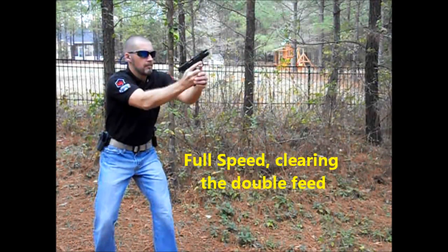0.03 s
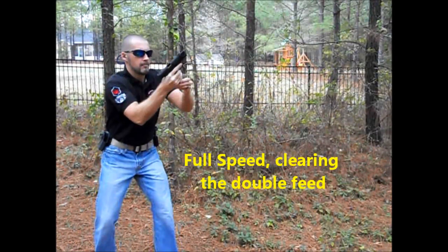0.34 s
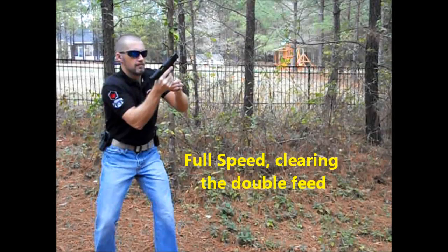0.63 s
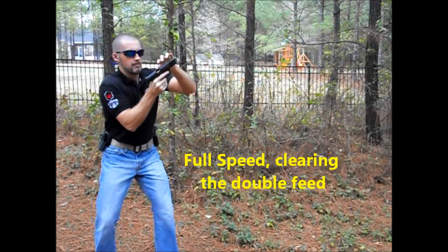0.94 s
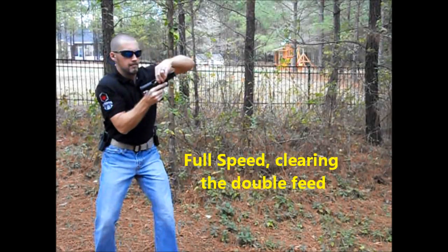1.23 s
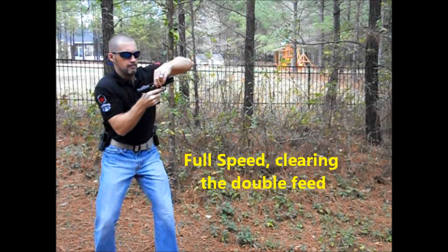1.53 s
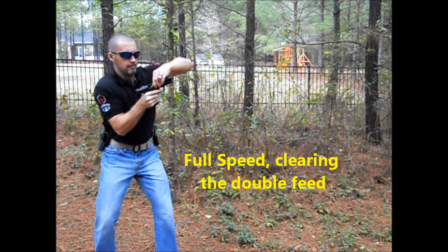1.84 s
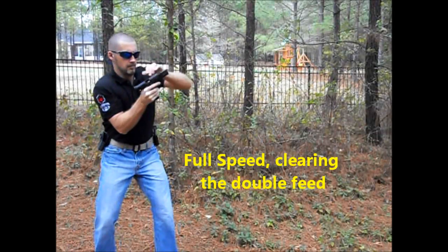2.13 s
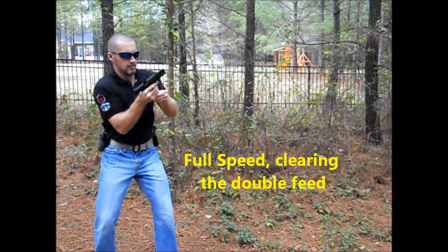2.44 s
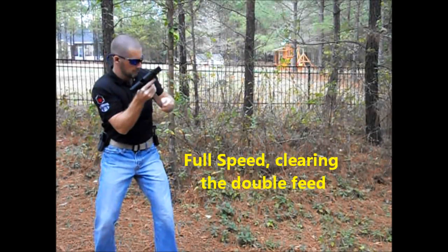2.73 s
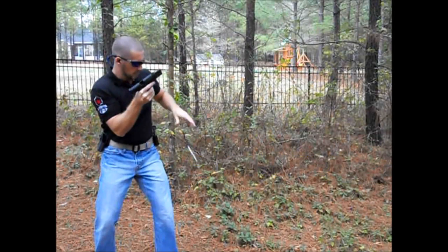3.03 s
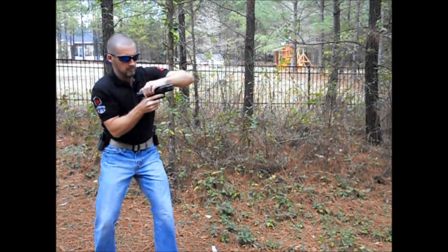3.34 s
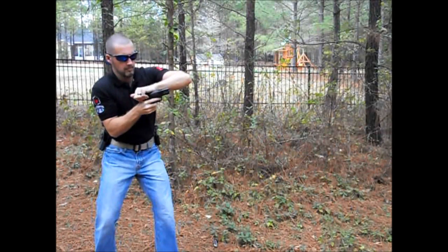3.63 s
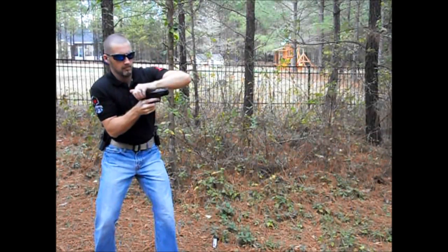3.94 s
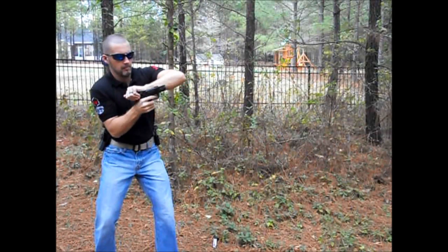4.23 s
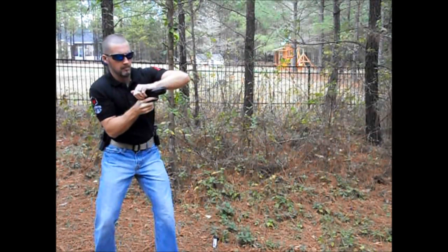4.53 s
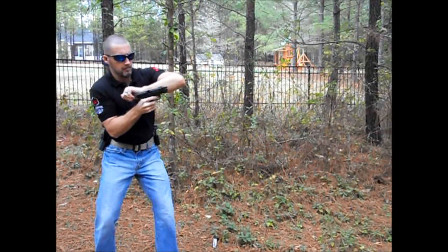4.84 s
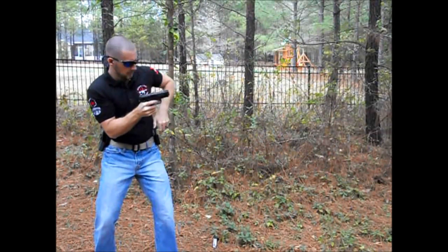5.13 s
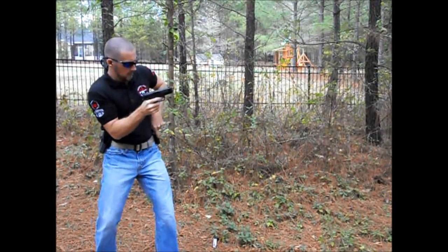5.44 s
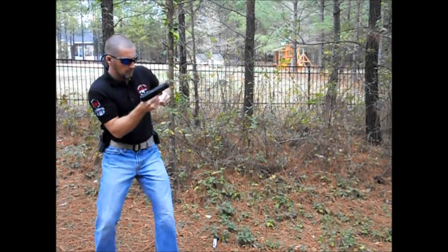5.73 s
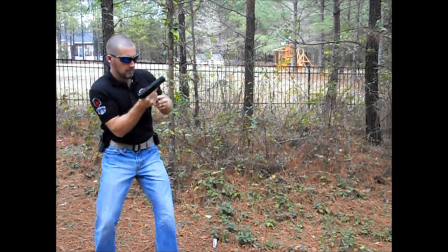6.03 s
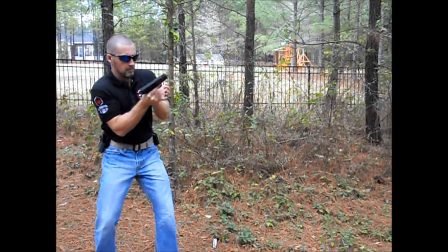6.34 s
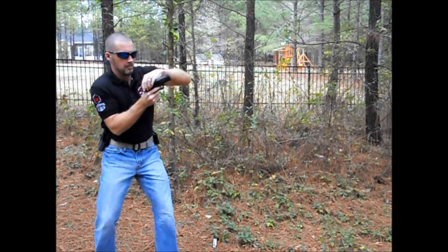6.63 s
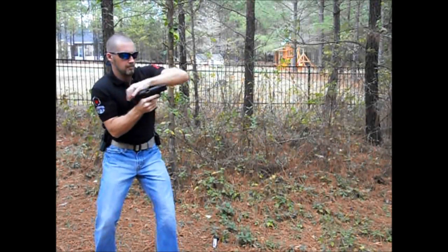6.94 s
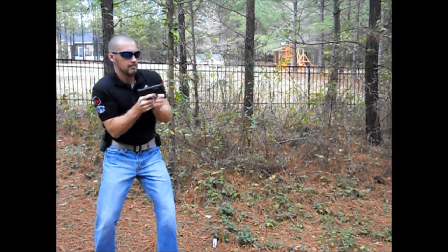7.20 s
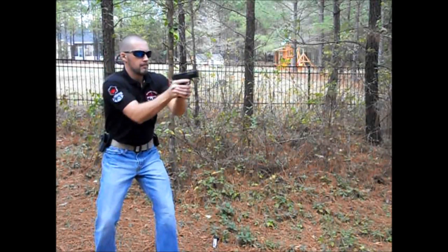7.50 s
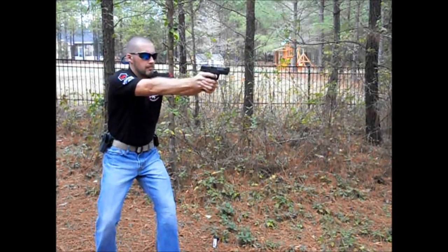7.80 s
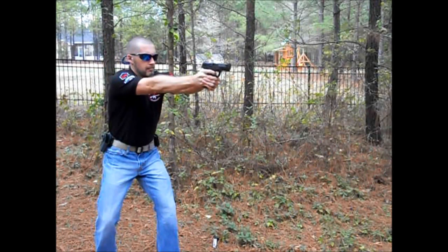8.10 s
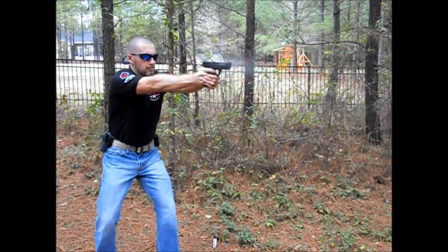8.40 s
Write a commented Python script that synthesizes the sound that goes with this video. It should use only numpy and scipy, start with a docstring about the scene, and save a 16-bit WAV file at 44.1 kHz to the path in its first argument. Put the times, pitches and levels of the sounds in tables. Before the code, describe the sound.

Faint traffic hums outdoors as a handgun is racked repeatedly, reloaded with metallic clacks, and fired once.

```python
"""Far traffic hums behind the trees of a wood. Then a pistol clacks, steel striking steel: its slide
(the moving top) is locked back, the magazine pulled out, the slide worked three times, a fresh magazine
pushed in and the slide worked again. Each time the slide slams shut, its spring buzzes and rings.
One shot is fired, and ground and trunks throw the blast back. An automatic volume control ducks
at every loud bang, holds, then lets the background swell back."""
import sys
import numpy as np
from scipy import signal
from scipy.fft import rfft, irfft, next_fast_len
from scipy.io import wavfile
from scipy.ndimage import minimum_filter1d, map_coordinates

SR = 44100
rng = np.random.default_rng(int(sys.argv[2]) if len(sys.argv) > 2 else 0)


def store_pcm(level_fs):
    """Save levels as 16-bit WAV."""
    pcm = np.round(np.clip(level_fs, -1, 1) * 32767).astype(np.int16)
    wavfile.write(sys.argv[1], SR, np.atleast_2d(pcm).T)


N = 381940
TIME = np.arange(N) / SR

# tone colour of far traffic and hiss: (frequency [Hz], level [dB])
AIR_COLOUR = [(12, -33.5), (20, 1), (114, -2), (152, -8.5), (230, -8.5), (332, -8), (430, -9.5),
              (503, -5.5), (687, -8.5), (762, -7.5), (1220, -10), (1350, -12.5), (2100, -17), (7710, -22.5),
              (10000, -24.5), (13000, -53), (22000, -120)]
# loudness of two far engines: (time [s], level [dB])
LOW_ENGINE = [(0, -73), (.65, -58.5), (2.05, -62), (2.601, -52.5), (3.701, -57), (4.3, -64.5), (6.4, -66.5),
              (7.699, -54.5)]
HIGH_ENGINE = [(0, -79), (5.2, -71.5), (5.8, -61.5), (8.299, -58.5)]
# loudness of far tyres going by: (time [s], level [dB])
TYRE_LEVELS = [(0, -60), (1.3, -56), (2.1, -52.5), (3.1, -53.5), (4.4, -52.5), (5.4, -57.5), (8.3, -58.5)]
# tone colour of the tyres: (frequency [Hz], level [dB])
TYRE_COLOUR = [(200, -22), (340, -2.5), (430, -7.5), (530, -1), (700, 0), (950, -8.5), (1600, -25)]
# scatter from near trunks; a fade time (t60) is the time to drop 60 dB: (frequency [Hz], fade time [s])
TREE_FADES = [(200, .2), (1000, 0.36), (2500, 0.18), (6000, 0.25), (10000, .24)]
# tone colour of the pistol: (frequency [Hz], level [dB])
PISTOL_COLOUR = [(60, -29), (300, -17), (700, -10.5), (1100, -9.5), (1600, -4), (2400, 0.5), (3200, 2.5),
                 (5500, -2.5), (8000, -4), (10300, -7), (12000, -24.5)]
# resonances, the pitches that slide and frame favour: (frequency [Hz], width [Hz], boost [dB])
RESONANCES = [(1610, 180, 3.5), (2150, 220, 4), (2520, 200, 1.5), (3700, 300, -1.5), (5210, 520, 5),
              (6050, 400, 5.5), (6950, 420, 3), (9400, 400, 1.5)]
# light ticks and knocks as pistol and magazines are handled: (time [s], level [dB], pitch [Hz])
TICKS = [(1.678, -32.5, 7150), (1.9825, -36, 4200), (2.2304, -44, 2000), (2.618, -36, 3540),
         (2.851, -32.5, 9950), (2.861, -36, 3140), (3.5546, -32, 5700), (3.56, -33.5, 2820),
         (3.6323, -32, 5640), (3.9278, -33, 2090), (4.079, -33, 5060), (4.109, -28.5, 4200),
         (4.6303, -27.5, 6180), (5.1503, -41.5, 1435), (5.4394, -31.5, 1160), (5.4728, -28, 1170),
         (5.9247, -39.5, 6040), (6.1315, -29.5, 2970), (7.206, -36, 1900)]
# slide or magazine rubbing on its guides: (start [s], end [s], final level [dB], swell [dB])
SCRAPES = [(2.611, 2.703, -37, 3.5), (1.145, 1.154, -36, 8), (3.271, 3.276, -24, 15.5),
           (3.597, 3.62, -48.5, -3), (4.629, 4.666, -39, -2), (5.438, 5.473, -39, -4.5),
           (6.09, 6.159, -29.5, 19), (6.888, 6.921, -25.5, 7)]
# three blows each for magazine out, jammed slide let go and fresh magazine in; more tilt is brighter:
# (time [s], level [dB], fade time [s], tilt [dB/octave], resonance [Hz], boost [dB])
CLACKS = [(2.6374, -28, .014, 1, 5540, 11), (2.642, -20.5, .026, -0.5, 2725, 24),
          (2.679, -21.5, .03, -0.5, 4700, 12.5), (3.2757, -9, 0.039, 5.5, 3667, 13),
          (3.2846, -8, .03, 4, 3005, 22.5), (3.2868, -7.5, 0.017, 4, 3017, 27.5),
          (6.1549, -18, .024, 5.5, 3332, 14), (6.1665, -10, .039, 0, 2500, 7),
          (6.1791, -5.5, .038, 0, 2005, 4.5)]
# the slide hits its rear stop: (time [s], level [dB], run-up softer by [dB], fade time [s],
# tilt [dB/octave], resonance [Hz], boost [dB])
PULLS = [(1.1543, -14.5, 18.5, 0.019, -.5, 5620, 15), (4.1326, -9.5, 25, 0.027, 0, 1620, 11.5),
         (4.6655, -9, 23, 0.033, -2.5, 6300, 14.5), (6.757, -2.5, 17.5, 0.033, -0.5, 2780, 8.5)]
# the slide slams shut: (time [s], level [dB], run-up softer by [dB], run-up step [s], bounce level [dB],
# buzz level [dB], ring level [dB])
SLAMS = [(3.7459, -2.5, 16, 0.01, -28.5, -11.5, -31), (4.3065, -3.5, 16, 0.011, -10, -34.5, -25),
         (4.8186, -1.5, 18, .009, -19, -19, -28.5), (6.922, -1.5, 8, 0.0091, -20, -33, -27.5)]
# ringing of spring and barrel: (frequency [Hz], level [dB], fade time [s])
RING_TONES = [(2842, -14.5, .3), (3278, -5.5, 0.68), (5195, -14, .3), (5270, -11, 0.23), (5986, -6, .2),
              (6444, -12, 0.16), (6990, -4.5, .25), (7725, -7, .15), (8037, -8.5, .21), (8200, -8.5, .22),
              (9028, -13, .3)]
# tone colour of the buzzing coils: (frequency [Hz], level [dB])
COIL_COLOUR = [(500, -26), (2000, -1), (5000, 3.5), (8000, 3), (10500, -4)]
# tone colours of the blast and of its echo: (frequency [Hz], level [dB])
BLAST_COLOUR = [(30, -6.5), (200, -10.5), (450, -4.5), (900, -2.5), (2000, -5), (6000, -4.5),
                (10500, -17.5)]
ECHO_COLOUR = [(40, -21.5), (250, -15.5), (480, 0.5), (900, 2.5), (1300, 0.5), (2000, -6.5), (5000, -9),
               (10000, -15)]
# how long the shot lingers in the wood: (frequency [Hz], fade time [s])
FOREST_FADES = [(100, 0.54), (350, 0.53), (900, 0.95), (2000, 0.84), (5000, .6), (10000, 0.28)]
# single trunks throw the shot back: (delay [s], level [dB])
TRUNK_ECHOES = [(0.0352, -4.5), (0.0691, -10), (.086, -23)]


def amp(db):
    """Turn decibels into a multiplier."""
    return 10 ** (np.asarray(db) / 20)


def unit(x):
    """Scale x to an average power of 1."""
    return x / np.sqrt(np.mean(x ** 2) + 1e-20)


def burst(x):
    """Scale x to the energy of 5 ms at power 1."""
    return x * np.sqrt(.005 * SR / (np.sum(x ** 2) + 1e-20))


def along(points, hz):
    """Read between (frequency, value) points, spaced by octaves."""
    freqs, values = np.transpose(points)
    return np.interp(np.log(hz + 1), np.log(freqs + 1), values)


def add(track, s, x):
    """Mix x into the track from time s."""
    part = track[round(s * SR):][:len(x)]
    part += x[:len(part)]


def wobble(rate):
    """A smooth curve through `rate` random values a second."""
    return map_coordinates(rng.standard_normal(int(N * rate / SR) + 4), [TIME * rate])


def filtered(x, gain):
    """Multiply each frequency in x by gain(hz)."""
    size = next_fast_len(len(x) + 8192)
    return irfft(rfft(x, size) * gain(np.fft.rfftfreq(size, 1 / SR)), size)[:len(x)]


def coloured(x, colour, size=2048):
    """Shape x by colour(hz) in dB, so that ringing only comes after a hit."""
    cepstrum = irfft(np.log(amp(colour(np.fft.rfftfreq(size, 1 / SR)))))
    cepstrum[1:size // 2] *= 2
    cepstrum[size // 2 + 1:] = 0
    return signal.fftconvolve(x, irfft(np.exp(rfft(cepstrum))))


def smoothed(x, lag_s):
    """Follow x slowly, evening out quick changes."""
    keep = np.exp(-1 / (SR * lag_s))
    return signal.lfilter([1 - keep], [1, -keep], x)


def chatter(t60):
    """Noise that starts at once and dies away."""
    t = TIME[:SR // 3]
    return rng.standard_normal(len(t)) * np.exp(-np.log(1000) * t / t60)


def tail(fades):
    """A wash of echoes, each frequency dying at its own speed."""
    hz, t, spectrum = signal.stft(rng.standard_normal(SR // 2), SR, nperseg=256)
    fade = np.exp(-np.log(1000) * t / along(fades, hz)[:, None])
    echoes = signal.istft(spectrum * fade, SR, nperseg=256)[1]
    return echoes / np.linalg.norm(echoes)


def bump(hz, centre, width):
    """A resonance peak of height 1."""
    return 1 / (1 + (2 * (hz - centre) / width) ** 2)


def engine(hz, levels, waver_hz):
    """A distant motor's firing tone, wavering in the air."""
    pitch = hz + waver_hz * wobble(7.4)
    tone = unit(np.sin(2 * np.pi * np.cumsum(pitch) / SR))
    return amp(np.interp(TIME, *np.transpose(levels)) + 3 * wobble(4.6)) * tone


def traffic(rumble_db=-49, hiss_db=-52.5, split_hz=1500):
    """Far traffic rumbles and two engines hum under an even hiss."""
    low = lambda hz: 1 / np.sqrt(1 + (hz / split_hz) ** 4)
    high = lambda hz: np.sqrt(1 - low(hz) ** 2) * (hz < 11500)
    air = lambda hz: amp(along(AIR_COLOUR, np.minimum(hz, 9500)))
    rumble = unit(filtered(rng.standard_normal(N), lambda hz: air(hz) * low(hz)))
    hiss = unit(filtered(rng.standard_normal(N), lambda hz: air(hz) * high(hz)))
    swell = amp(rumble_db + .41 * wobble(2.7))
    engines = engine(119, LOW_ENGINE, waver_hz=1.3) + engine(195.5, HIGH_ENGINE, waver_hz=2.3)
    return swell * rumble + amp(hiss_db) * hiss + engines


def tyres():
    """Tyres make a hollow roar on a distant road."""
    roar = unit(filtered(rng.standard_normal(N), lambda hz: amp(along(TYRE_COLOUR, hz)) * (hz < 2500)))
    return amp(np.interp(TIME, *np.transpose(TYRE_LEVELS)) + wobble(3.3)) * roar


def outdoors(x, scatter_db):
    """A sound followed by its scatter from ground and trunks."""
    path = amp(scatter_db) * tail(TREE_FADES)
    path[0] += 1
    return signal.fftconvolve(x, path)


def steel(hz):
    """How strongly the pistol sounds at each frequency, in dB."""
    peaks = sum(db * bump(hz, centre, width) for centre, width, db in RESONANCES)
    return along(PISTOL_COLOUR, hz) + peaks


def blow(t60, tilt, resonance_hz, boost_db, scatter_db=-15):
    """Steel parts meet and chatter briefly; the gripping hands damp the ring."""
    broad = lambda hz: steel(hz) + tilt * np.log2(np.maximum(hz, 1300) / 4000)
    colour = lambda hz: broad(hz) + boost_db * bump(hz, resonance_hz, width=190)
    contact = chatter(t60)
    # the trees scatter sound sent in all directions, in which no one resonance leads
    out = amp(scatter_db) * burst(signal.fftconvolve(coloured(contact, broad), tail(TREE_FADES)))
    add(out, 0, burst(coloured(contact, colour)))
    return out


def tick(hz):
    """Small parts tick high and bright, large ones knock low and dull."""
    return blow(t60=.028, tilt=7.7 * np.log2(hz / 3700), resonance_hz=hz, boost_db=8.5)


def rattle(start_s=3.1, end_s=3.8, per_second=12, db=-42.5, pitch_hz=4000, spread_octaves=.4):
    """The loose slide ticks faintly in the grip at random moments."""
    out = np.zeros(N)
    for _ in range(round(per_second * (end_s - start_s))):
        s = rng.uniform(start_s, end_s)
        strength = amp(db + 3 * rng.normal())
        add(out, s, strength * tick(pitch_hz * 2 ** (spread_octaves * rng.normal())))
    return out


def ticks():
    """Light ticks and knocks as the pistol and its magazines are handled."""
    out = np.zeros(N)
    for s, db, hz in TICKS:
        add(out, s, amp(db) * tick(hz))
    return out


def scrapes(grain_db=4):
    """Sliding steel catches in tiny uneven slips, louder the faster it moves."""
    out = np.zeros(N)
    rub = unit(coloured(rng.standard_normal(N) * amp(grain_db * wobble(500)), steel))
    for start, end, db, swell_db in SCRAPES:
        stroke = rub[round(start * SR):round(end * SR)]
        swell = amp(np.linspace(db - swell_db, db, len(stroke)))
        add(out, start, outdoors(swell * stroke, scatter_db=-20))
    return out


def squeak(start_s=2.653, length_s=.019, from_hz=5600, to_hz=7900, db=-35):
    """The tight magazine squeaks upward in pitch as it is ripped out."""
    out = np.zeros(N)
    pitch = np.linspace(from_hz, to_hz, round(length_s * SR))
    tone = unit(np.sin(2 * np.pi * np.cumsum(pitch) / SR))
    add(out, start_s, amp(db) * signal.windows.tukey(len(tone), .4) * tone)
    return out


def clacks():
    """Hard blows of magazine and slide, each bringing out its own resonance."""
    out = np.zeros(N)
    for s, db, t60, tilt, hz, boost_db in CLACKS:
        add(out, s, amp(db) * blow(t60, tilt, hz, boost_db))
    return out


def run_up(stop_s, last_db, step_s, t60, tilt, growth_db=7.5):
    """The moving slide catches three times, harder each time as it nears its stop."""
    out = np.zeros(N)
    for k in range(3):  # counting back from the stop
        catch = blow(t60, tilt, resonance_hz=5400, boost_db=4)
        add(out, stop_s - (k + 1) * step_s, amp(last_db - k * growth_db) * catch)
    return out


def pulls():
    """The slide rattles back along its rails and strikes the rear stop."""
    out = np.zeros(N)
    for s, db, softer_db, t60, tilt, hz, boost_db in PULLS:
        out += run_up(s, db - softer_db, step_s=.011, t60=.06, tilt=.8)
        add(out, s, amp(db) * blow(t60, tilt, hz, boost_db))
    return out


def slams(bounce_s=.007):
    """The spring drives the slide forward; it hits home and bounces once."""
    out = np.zeros(N)
    for s, db, softer_db, step_s, bounce_db, _, _ in SLAMS:
        out += run_up(s, db - softer_db, step_s, t60=.05, tilt=2.5)
        add(out, s, amp(db) * blow(t60=.032, tilt=2, resonance_hz=5400, boost_db=8.5))
        add(out, s + bounce_s, amp(bounce_db) * blow(t60=.018, tilt=.3, resonance_hz=3177, boost_db=16.5))
    return out


def spring(buzz_t60=.15, beat_hz=22, flutter_db=4.5):
    """Each slam shakes the spring: its coils buzz, and pairs of close tones throb and ring on."""
    out, t = np.zeros(N), TIME[:SR // 2]
    for s, *_, buzz_db, ring_db in SLAMS:
        ring = np.zeros(len(t))
        for hz, db, t60 in RING_TONES:
            fade = amp(db + rng.normal(0, 1.5)) * np.exp(-np.log(1000) * t / t60)
            twin_hz = hz + beat_hz * rng.uniform(.5, 1.5)
            ring += fade * (np.sin(2 * np.pi * hz * t) + .5 * np.sin(2 * np.pi * twin_hz * t))
        add(out, s, amp(ring_db) * burst(ring * amp(flutter_db * wobble(90)[:len(t)])))
        add(out, s, amp(buzz_db) * burst(coloured(chatter(buzz_t60), lambda hz: along(COIL_COLOUR, hz))))
    return out


def shot(s=8.2934, push_s=.00568, suction_s=.0077):
    """The firing pin snaps; the blast pushes the air, then sucks it back; ground and trees answer."""
    out, t = np.zeros(N), TIME[:SR // 3]
    blast = lambda t60: burst(coloured(chatter(t60), lambda hz: along(BLAST_COLOUR, hz)))
    echo = lambda x: burst(coloured(x, lambda hz: along(ECHO_COLOUR, hz)))
    add(out, s - .0025, amp(-29) * burst(coloured(chatter(t60=.022), steel)))  # firing pin
    add(out, s, amp(7) * blast(t60=.0023))  # the crack itself
    add(out, s + .0058, amp(-6) * blast(t60=.0057))  # bounce off the ground
    add(out, s, amp(-2) * blast(t60=.43))  # lingering roar close by
    push = amp(-5) * t / push_s
    suction = -amp(-3) * np.exp(-(t - push_s) / suction_s)
    add(out, s, np.where(t < push_s, push, suction))
    add(out, s + .013, amp(1) * echo(tail(FOREST_FADES)))
    for delay, db in TRUNK_ECHOES:
        add(out, s + delay, amp(db) * echo(chatter(t60=.0204)))
    return out


def scene():
    """Mix pistol and traffic into one channel."""
    handling = pulls() + slams() + clacks() + ticks() + scrapes() + squeak() + spring()
    return (handling + shot() + traffic() + tyres() + rattle())[None]


def auto_gain(x, target_db=-26.5, lowest_db=-36, attack_s=.012, hold_s=.58, rise_per_s=.9):
    """The volume drops on a loud sound, holds, then climbs back at a steady rate."""
    level = np.sqrt(np.abs(smoothed(x ** 2, lag_s=.0036)) + 1e-12)
    needed = np.clip(amp(target_db) / level, amp(lowest_db), 1)
    half = int(hold_s * SR / 2)
    held = minimum_filter1d(needed, 2 * half + 1, origin=half, mode="nearest")
    ramp = rise_per_s * TIME
    recovering = np.minimum.accumulate(held - ramp) + ramp
    return np.exp(smoothed(np.log(recovering), attack_s))


def record(dry, band_hz=10500, top_hz=16000, overload=.44, ceiling=.31):
    """The volume is turned down on loud sounds, peaks are squashed and the highest treble is cut."""
    x = dry[0] * auto_gain(dry[0])
    x = x / (1 + np.abs(x / overload) ** 6) ** (1 / 6)  # the overloaded input rounds off peaks
    x = signal.sosfilt(signal.butter(2, 7, "high", fs=SR, output="sos"), x)  # remove drift below 7 Hz
    x = filtered(x, lambda hz: 1 / np.sqrt(1 + (hz / band_hz) ** 140))
    x = np.clip(x, -ceiling, ceiling)
    return filtered(x, lambda hz: 1 / np.sqrt(1 + (hz / top_hz) ** 140))[None]


dry = scene()
out = record(dry)
store_pcm(out)
```